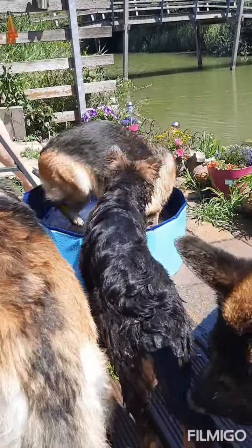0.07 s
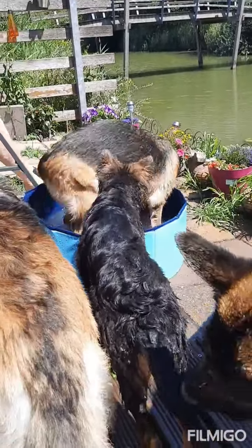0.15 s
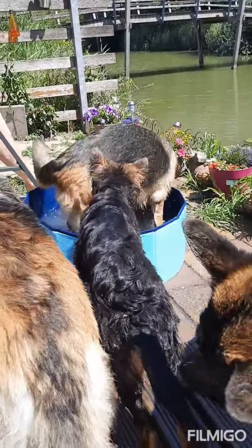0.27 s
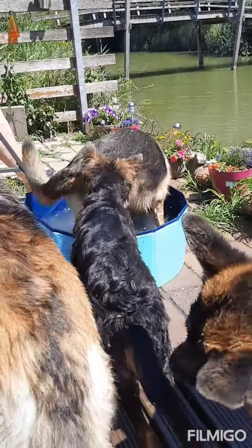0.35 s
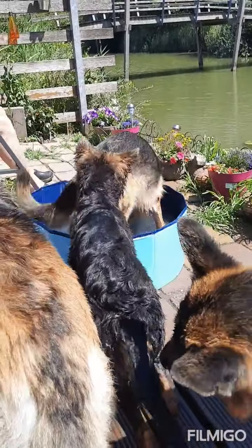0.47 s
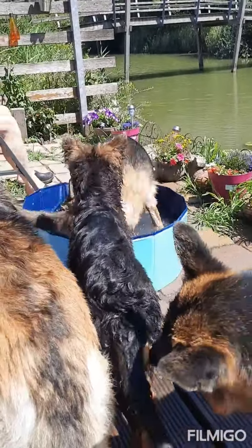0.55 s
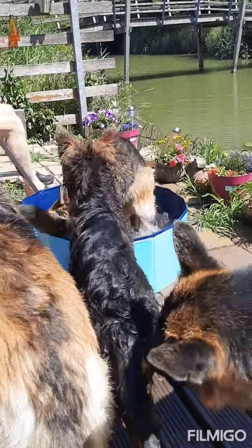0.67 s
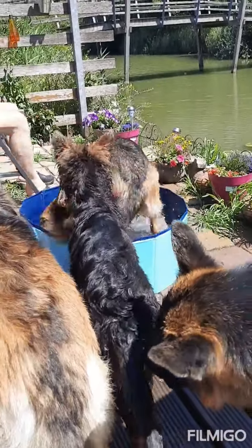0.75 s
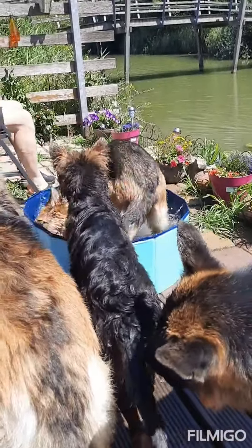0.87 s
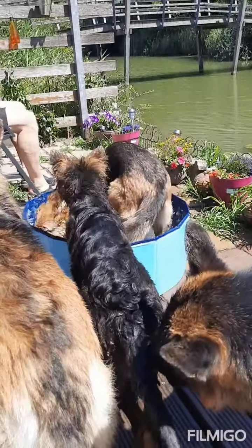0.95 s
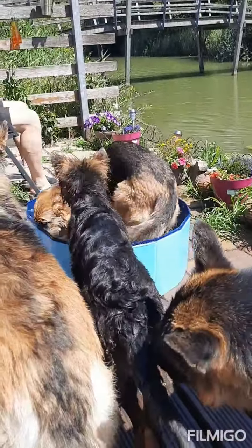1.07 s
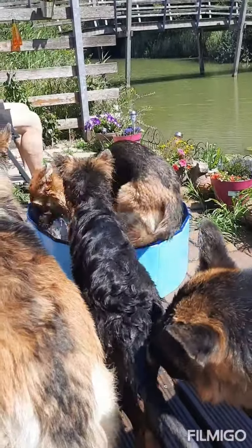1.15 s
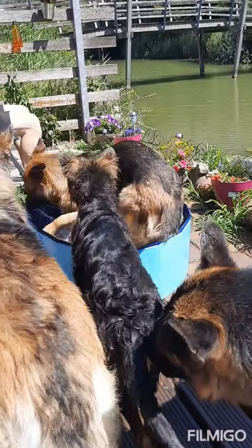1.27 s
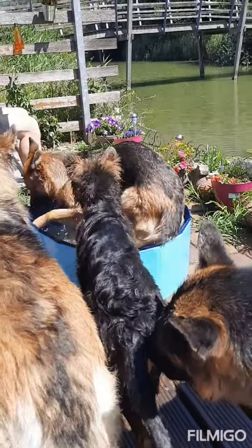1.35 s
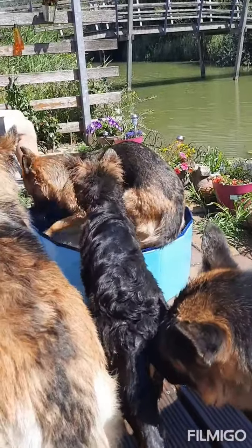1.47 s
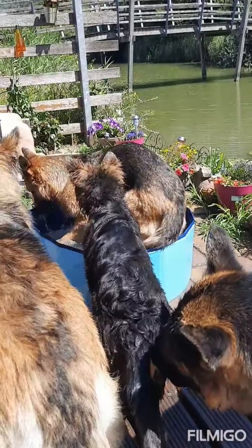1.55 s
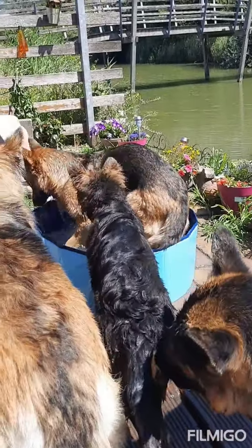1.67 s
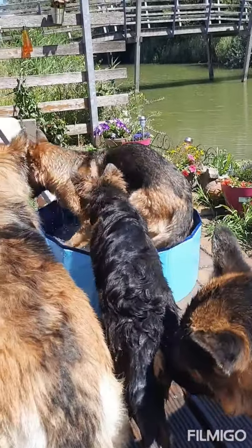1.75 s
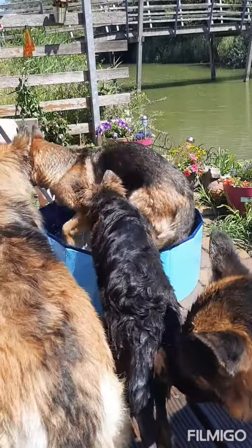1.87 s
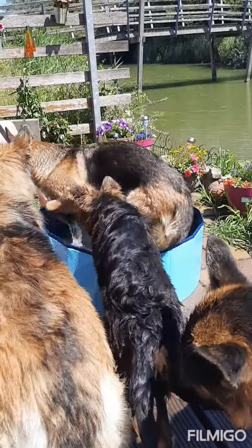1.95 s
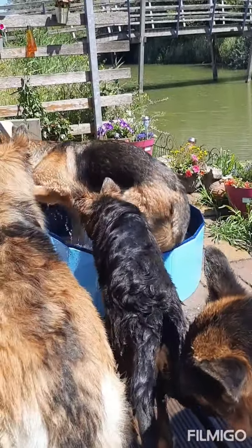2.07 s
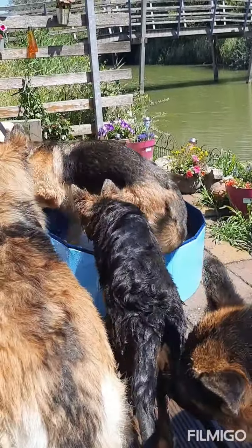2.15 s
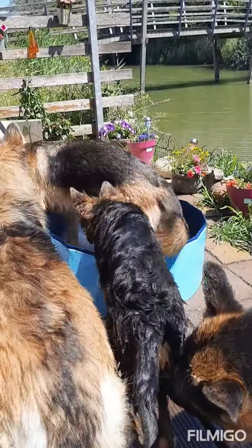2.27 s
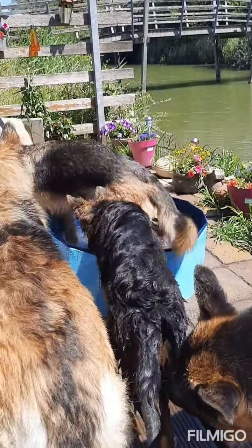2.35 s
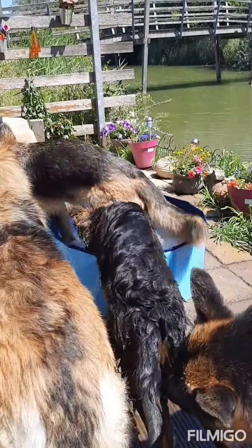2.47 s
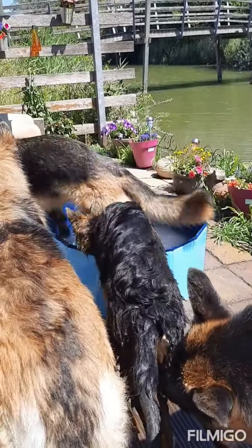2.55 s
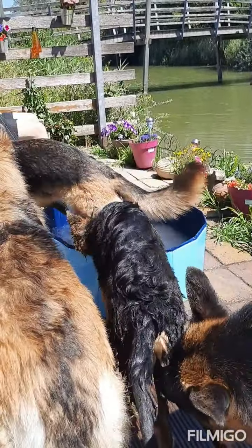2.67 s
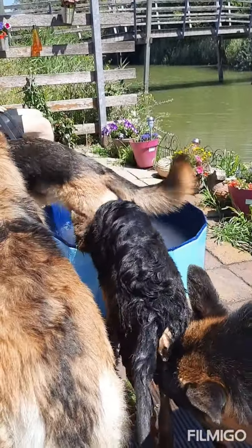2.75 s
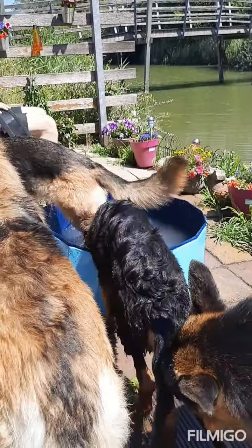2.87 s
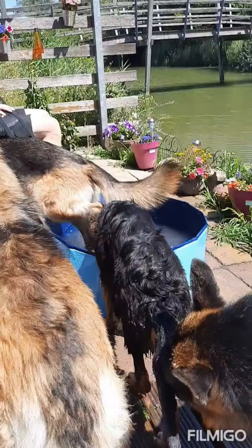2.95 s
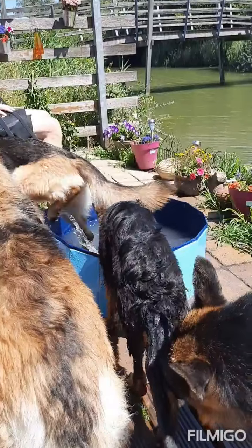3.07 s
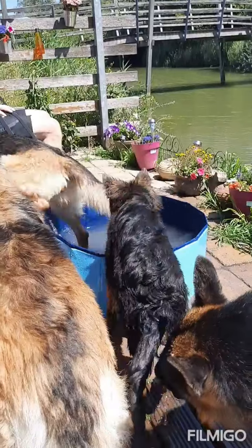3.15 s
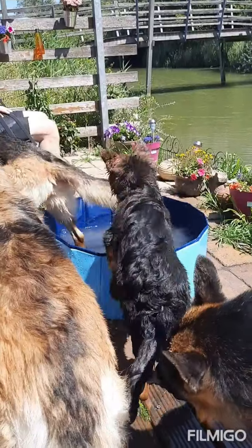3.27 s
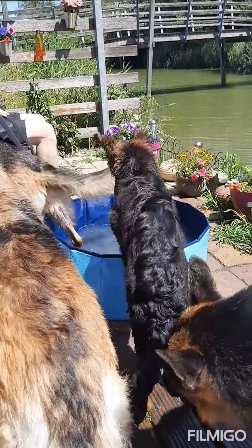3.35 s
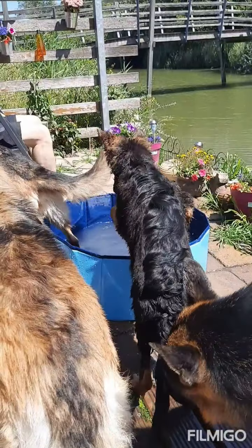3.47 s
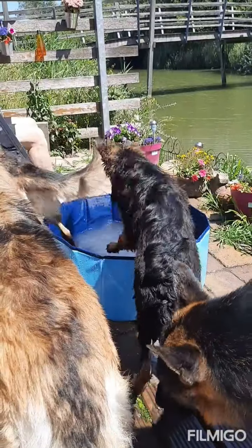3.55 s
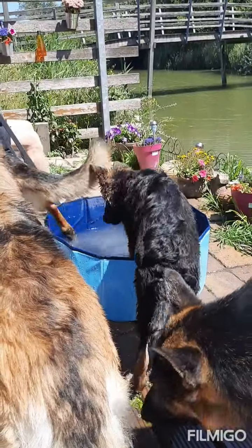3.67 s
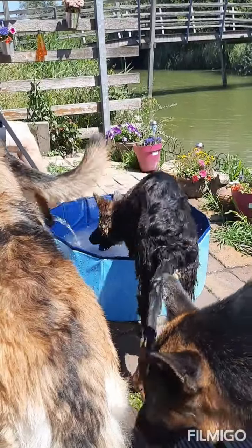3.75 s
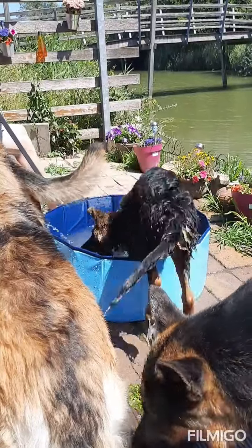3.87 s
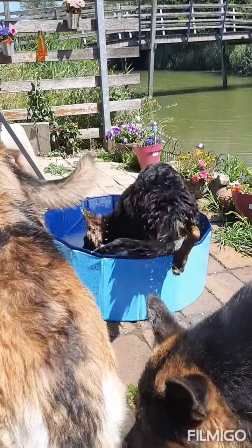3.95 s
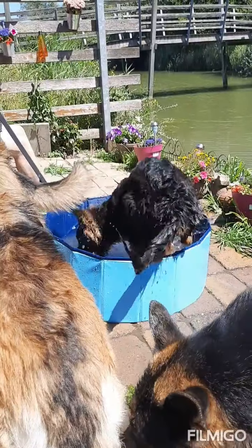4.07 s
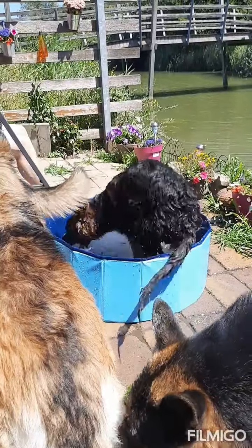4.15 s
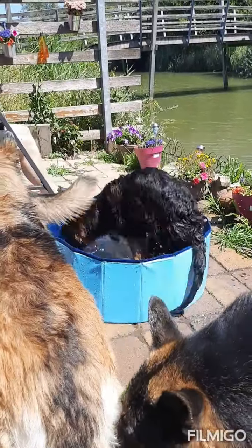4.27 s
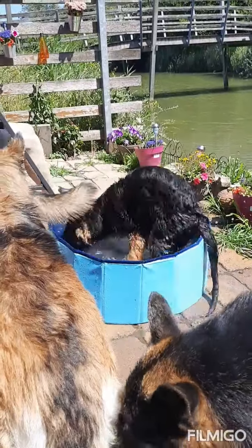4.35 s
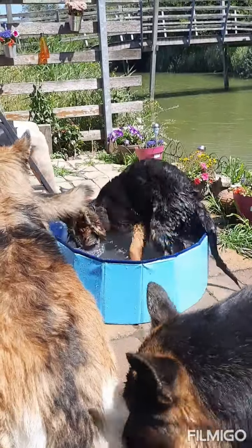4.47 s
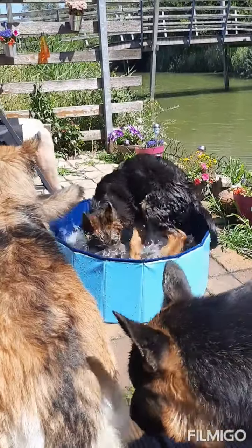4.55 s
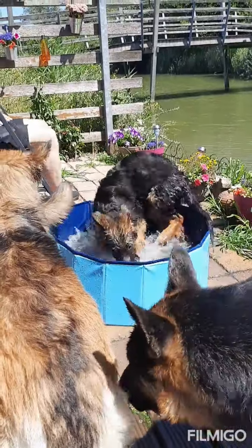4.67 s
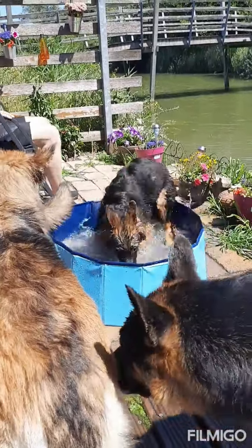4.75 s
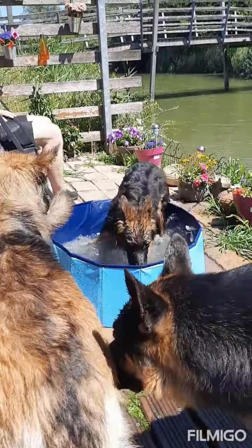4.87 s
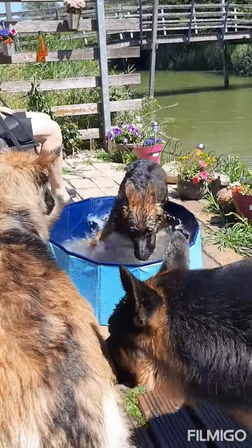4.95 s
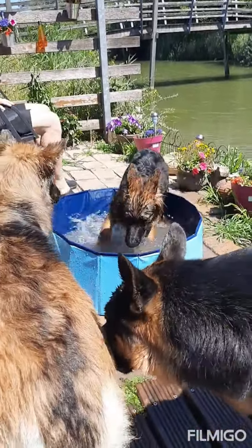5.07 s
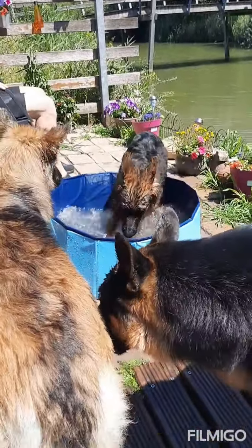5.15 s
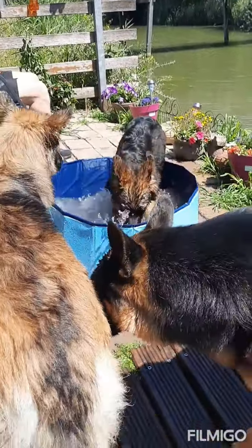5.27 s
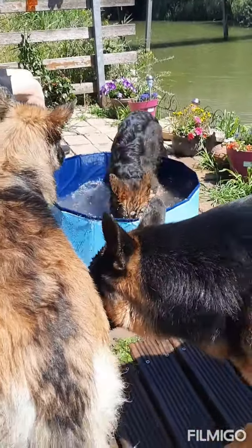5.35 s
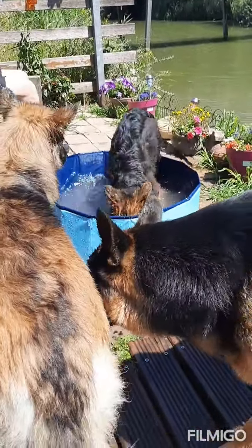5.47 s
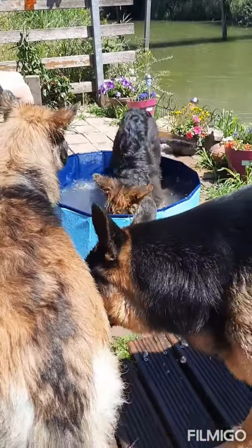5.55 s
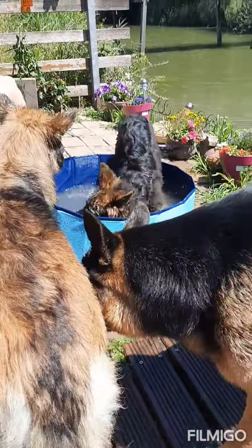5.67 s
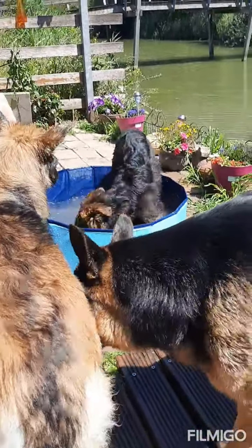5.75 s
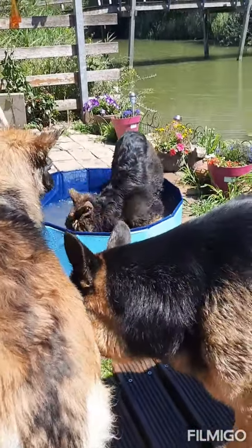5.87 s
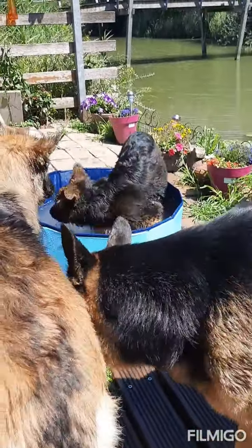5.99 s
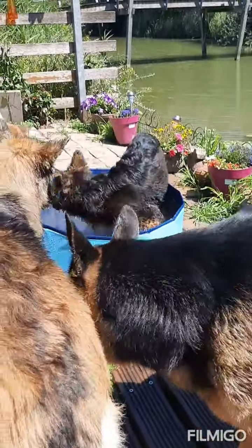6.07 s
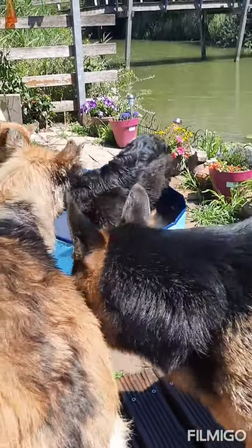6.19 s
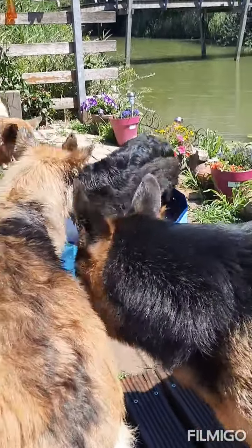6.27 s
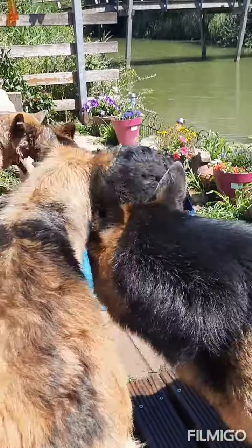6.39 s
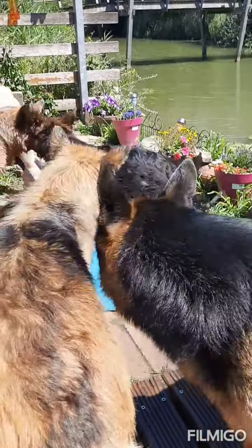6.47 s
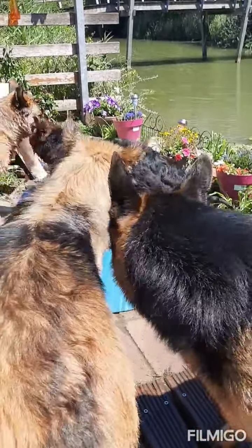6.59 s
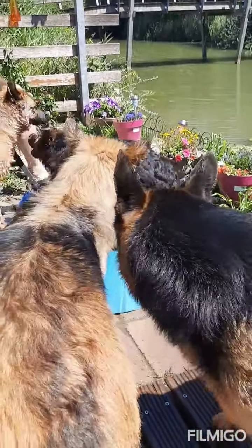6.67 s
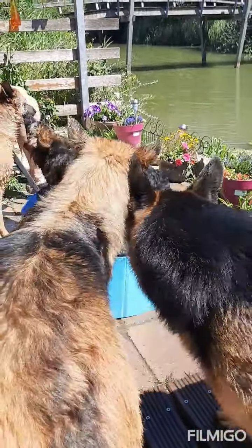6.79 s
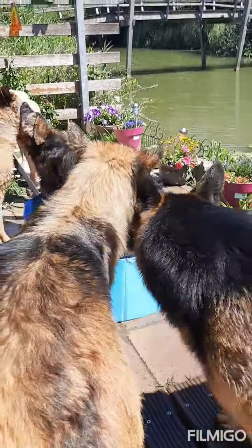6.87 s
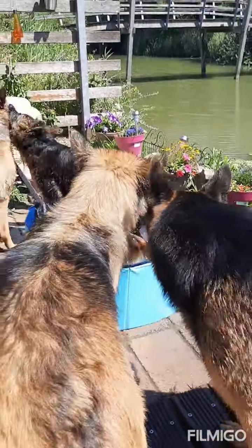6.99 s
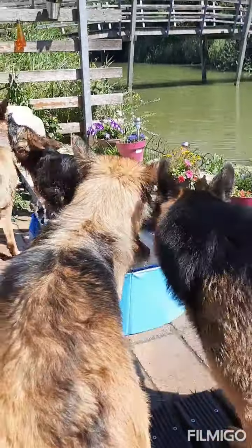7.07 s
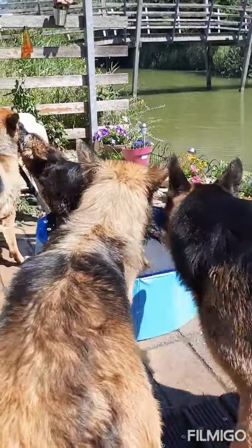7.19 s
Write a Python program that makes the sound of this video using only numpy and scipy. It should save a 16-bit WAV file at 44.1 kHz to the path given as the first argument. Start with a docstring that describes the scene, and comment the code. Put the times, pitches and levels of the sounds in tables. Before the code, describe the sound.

A faint outdoor hush and light breeze run throughout, picked up close in stereo. From 0 to 1.3 s quick paw strokes churn water in a small plastic pool: hollow gulps, clusters of bubbles and crisp hissing spray, with a prominent round gulp near 1.15 s. From about 1.3 to 3.8 s it is much quieter: scattered drips, small slaps, a short plop near 2.8 s, and low wind thuds leaning left. Around 3.9 s pawing resumes and thickens from 4.3 to 5.1 s, with deep gulps, bubbling gushes, sharp splashes and dull stamps on the pool floor. Smaller strokes and slaps continue to 6 s as the breeze swells. After a short lull, splashing surges from 6.4 s, with the loudest hollow stamp at 6.83 s, then bubbly slaps until the end at 7.2 s. Pool walls and paving add brief, tight echoes.

```python
"""Dogs wade and paw in a small plastic paddling pool on a patio, heard by two microphones.
A hush and light breeze run throughout. Quick strokes open it: paws trap air that rings as bubbles of
every size and throw hissing spray. From about 1.3 s mostly drips, small slaps and low wind thuds remain.
Busy pawing returns from 4 to 6 s, with gulps, gushes and stamps on the floor; after a short lull
come a last burst and the loudest stamp, near 6.8 s. Pool and paving echo the bubbles and stamps."""
import sys
import numpy as np
from scipy import signal
from scipy.fft import rfft, irfft, next_fast_len
from scipy.io import wavfile
from scipy.ndimage import uniform_filter1d

SR = 44100
rng = np.random.default_rng(int(sys.argv[2]) if len(sys.argv) > 2 else 0)


def digitize_waveform(pressure):
    """Quantize a signal to 16-bit integers and store it at the path in sys.argv[1].

    Rows of a 2-D input are taken as channels; values are limited to [-1, 1].
    """
    field = np.atleast_2d(pressure).T
    bounded = np.clip(field, -1, 1)
    quanta = np.round(bounded * 32767).astype(np.int16)
    wavfile.write(sys.argv[1], SR, quanta)


N = 318402
SIDES = np.array([[.5], [-.5]])  # splits a left-right difference in dB over the two channels


def amp(db):
    """Amplitude factor of a level in dB."""
    return 10 ** (np.asarray(db) / 20)


def evened(x):
    """Scale to an RMS of 1."""
    return x / np.sqrt(np.mean(x ** 2) + 1e-20)


def smoothed(x, samples):
    """Two passes of a moving average."""
    return uniform_filter1d(uniform_filter1d(x, samples), samples)


def read(points, hz):
    """Read a curve of (Hz, value), interpolated over log frequency."""
    f, value = np.transpose(points)
    return np.interp(np.log(hz + 1), np.log(f + 1), value)


def column(table, order):
    """One column of a time table at every sample."""
    rows = np.array(table)
    return np.interp(np.arange(N) / SR, rows[:, 0], rows[:, order])


def add(mix, s, sound):
    """Add a sound at s seconds, cut off at the end of the mix."""
    part = mix[..., round(s * SR):][..., :sound.shape[-1]]
    part += sound[..., :part.shape[-1]]


def noise(spectrum, same, size, patchy_db, flicker_db, lead_s=0):
    """Two-channel random short-time spectra with drifting patches and wide-band flicker."""
    frames, hz = 4 * N // size + 5, np.fft.rfftfreq(size, 1 / SR)
    a, b, c, d, patches = rng.standard_normal((frames, len(hz), 5)).T
    patches = uniform_filter1d(patches, size // 64, 0)  # over frequency
    patches = evened(uniform_filter1d(patches, 6, 1))  # over time
    flicker = evened(uniform_filter1d(rng.standard_normal(frames), 2))
    like = read(same, hz)[:, None]
    late = np.exp(-2j * np.pi * hz * lead_s)[:, None]
    left = a + 1j * b
    right = like * late * left + np.sqrt(1 - like ** 2) * (c + 1j * d)
    level_db = read(spectrum, hz)[:, None] + patchy_db * patches + flicker_db * flicker
    z = np.array([left, right]) * amp(level_db)
    return evened(signal.istft(z, nperseg=size, noverlap=3 * size // 4)[1][:, :N])


def surge(peak_s, length_s, rise_share, drop_db):
    """Gain that climbs to 1 at the peak and sinks again, steadily in dB."""
    t = (np.arange(N) / SR - peak_s) / length_s
    return amp(-drop_db * np.maximum(-t / rise_share, t / (1 - rise_share)))


def bubble(hz, t60_s, rise, turns, hold=0.99):
    """A sine that climbs as the bubble nears the surface; it swells over a few turns, holds and dies."""
    t = np.arange(0, t60_s, 1 / SR)
    tone = np.sin(2 * np.pi * hz * (t + .5 * rise * t ** 2 / t60_s))
    return tone * amp(-60 * (t / t60_s) ** hold) * np.tanh(t * hz / turns)


def swarm(lo_hz, hi_hz, per_s, cycles, spread_db, share, steady=.5, clumpy=0, count=40):
    """Random bubbles, most faint, a few large; slow swings in their summed level are evened by steady."""
    out = np.zeros(N)
    clumps = np.exp(clumpy * evened(smoothed(rng.standard_normal(N), 500)) - clumpy ** 2 / 2)
    for hz in np.geomspace(lo_hz, hi_hz, count):
        size = amp(spread_db * np.minimum(rng.exponential(1, N), 4))
        births = size * (rng.random(N) < clumps * per_s / count / SR)
        shape = bubble(hz, cycles / hz * rng.uniform(1.0, 1.74), rng.uniform(0, 1.0), 0.71)
        out += amp(read(share, hz)) * signal.oaconvolve(births * rng.choice([-1, 1], N), shape)[:N]
    power = smoothed(evened(out) ** 2, 1500)
    return evened(out / (abs(power) + 0.04) ** (steady / 2))


# Outdoor hush. Each row: frequency in Hz, relative density in dB per Hz.
HUSH_SPECTRUM = [(90, -32), (150, -5), (315, 16), (475, -11), (760, -4), (979, -4.5), (2000, -15),
                 (2500, 2), (2950, -32), (12400, -10.5), (16000, -19)]
# Left-right likeness of the hush. Each row: frequency in Hz, likeness from 0 to 1.
HUSH_LIKENESS = [(100, 0.33), (950, 0.4), (4000, 0.05)]
HUSH_DB = -68.5


def hush():
    """Steady outdoor air noise, mildly patchy, little shared between the channels."""
    return amp(HUSH_DB) * noise(HUSH_SPECTRUM, HUSH_LIKENESS, 512, patchy_db=3.2, flicker_db=0.77)


# Wind pressure. Each row: frequency in Hz, relative density in dB per Hz.
WIND_SPECTRUM = [(20, 7), (35, 0), (55, 5), (90, 2), (140, -7), (220, -31), (400, -71)]
# Breeze at the microphone ports. Each row: time in seconds, level in dB ahead of the bass loss.
BREEZE_LEVEL = [(0.0, -59), (0.9, -67), (2.0, -65.5), (3.6, -67.5), (4.2, -69), (5.3, -57.5), (6.2, -53.5),
                (7.22, -65)]
BREEZE_LEAN_DB = 5  # left over right
# Gusts and low thuds at the ports. Each row: peak in seconds, length in seconds,
# level in dB ahead of the bass loss, left-right difference in dB.
WIND_BUFFETS = [(0.42, 0.43, -53, 2), (1.166, 0.21, -52.5, 12), (1.733, 0.16, -54.5, 10),
                (2.437, 0.37, -51.5, 19.5), (2.75, 0.12, -45, 15), (2.942, 0.03, -46, 21),
                (3.047, 0.13, -48, 10), (3.17, 0.14, -55, 11), (3.376, 0.034, -38, 25),
                (3.47, 0.088, -47, -2), (4.12, 0.43, -48, 0), (4.444, 0.5, -47, 3), (4.816, 0.17, -41, -1),
                (5.021, 0.081, -36, -1), (6.522, 0.062, -40, 19), (6.576, 0.11, -34, 12),
                (6.793, 0.35, -40.5, 8), (7.049, 0.066, -43, 10), (7.22, 0.11, -54, 7)]
BUFFET_RISE_SHARE, BUFFET_DROP_DB = 0.45, 14


def wind():
    """Lumpy low pressure, partly shared between the ports, swelling in gusts."""
    lumps = noise(WIND_SPECTRUM, [(30, 0.11), (200, 1.0)], 1024, patchy_db=1.86, flicker_db=2.9)
    power = amp(column(BREEZE_LEVEL, order=1) + SIDES * BREEZE_LEAN_DB) ** 2
    for peak_s, length_s, db, pan_db in WIND_BUFFETS:
        gust = surge(peak_s, length_s, BUFFET_RISE_SHARE, BUFFET_DROP_DB)
        power = power + (amp(db + SIDES * pan_db) * gust) ** 2
    return lumps * np.sqrt(power)


# Stirring between strokes. Each row: time in seconds, then levels in dB of
# large bubbles, small bubbles, spray.
STIR_LEVELS = [(0.0, -42.5, -53, -47), (0.2, -74, -54.5, -58), (0.45, -66, -50, -53.5),
               (0.9, -62, -44, -42), (1.2, -49, -50.5, -49), (1.69, -69, -71, -58), (1.81, -67, -67.5, -63),
               (2.41, -70.5, -69.5, -62.5), (2.6, -66.5, -75, -66), (2.87, -67, -80, -62),
               (3.1, -63, -61, -54.5), (3.5, -65, -79, -64), (3.58, -74, -73, -89.5), (3.84, -60, -56, -55),
               (4.0, -53.5, -47.5, -50.5), (4.4, -49, -43.5, -44.5), (4.8, -39.5, -42.5, -41),
               (5.1, -37, -47, -41.5), (5.25, -49.5, -50, -46.5), (5.7, -48, -52.5, -48.5),
               (6.0, -76, -73, -59), (6.08, -58.5, -68, -54), (6.19, -68.5, -58, -71),
               (6.3, -82, -57, -60.5), (6.5, -41, -43.5, -47.5), (6.8, -47.5, -49, -44),
               (7.0, -66, -64, -49.5), (7.22, -54, -45, -52)]
# Paw strokes, by the air they drive in and the water they throw. Each row: peak in seconds,
# length in seconds, then levels in dB of big pockets, mid bubbles, small bubbles, spray.
PAW_STROKES = [(0.01, 0.077, -36.5, -58, -55, -46), (0.068, 0.1, -46, -40.5, -45.5, -66),
               (0.235, 0.13, -47, -39, -64, -65), (0.398, 0.09, -34, -42, -45.5, -41),
               (0.542, 0.11, -35, -41, -63, -46), (0.698, 0.48, -45, -38, -47.5, -66),
               (0.84, 0.11, -55, -55, -58, -45), (1.002, 0.12, -31, -33, -36.5, -46),
               (1.118, 0.23, -55, -38, -53, -69), (1.298, 0.15, -47, -63, -68, -46.5),
               (1.599, 0.03, -72, -81, -47, -65), (1.722, 0.02, -47, -35.5, -38, -44),
               (2.488, 0.068, -71, -79, -48.5, -48), (2.73, 0.18, -49.5, -60, -56, -45.5),
               (2.77, 0.066, -39.5, -42.5, -43, -43.5), (2.951, 0.082, -53, -70, -53.5, -55),
               (3.3, 0.19, -67, -69, -54.5, -58), (3.894, 0.082, -43.5, -37, -41.5, -49),
               (4.093, 0.041, -37, -35, -43, -53), (4.16, 0.071, -43, -49, -46, -47),
               (4.328, 0.099, -33, -35, -44.5, -42.5), (4.45, 0.1, -31, -34.5, -37.5, -42),
               (4.5, 0.06, -48, -53, -55, -65), (4.624, 0.11, -30, -33, -41, -40),
               (5, 0.078, -29.5, -42, -59, -45), (5.086, 0.055, -26.5, -52, -59, -52),
               (5.476, 0.037, -30.5, -36, -38, -56), (5.586, 0.19, -42.5, -43, -55, -47),
               (5.68, 0.11, -37.5, -59, -67, -58), (5.855, 0.12, -50.5, -70, -49, -46.5),
               (5.903, 0.19, -51.5, -56, -51.5, -60), (6.03, 0.026, -31.5, -44.5, -47, -50.5),
               (6.275, 0.15, -70, -53.5, -73, -54.5), (6.409, 0.11, -52, -37.5, -44.5, -51),
               (6.602, 0.19, -40.5, -36, -55, -66), (6.797, 0.2, -39, -40, -42.5, -56),
               (6.838, 0.024, -44, -31, -36, -48), (6.912, 0.059, -43, -36.5, -35, -40),
               (7.016, 0.07, -38, -46, -39.5, -49), (7.21, 0.39, -47.5, -34.5, -43.5, -48)]
STROKE_RISE_SHARE, STROKE_DROP_DB = 0.35, 13  # share of the length spent rising, fall at both ends


def stirred(stir_order, stroke_order, stir_offset_db=0):
    """Level of one layer: the stirring between strokes plus a surge at every stroke, summed as power."""
    power = amp(column(STIR_LEVELS, stir_order) + stir_offset_db) ** 2
    for row in PAW_STROKES:
        stroke = surge(row[0], row[1], STROKE_RISE_SHARE, STROKE_DROP_DB)
        power = power + (amp(row[stroke_order]) * stroke) ** 2
    return np.sqrt(power)


# Big air pockets by size. Each row: pitch in Hz, share in dB.
POCKET_SHARES = [(130, -9), (180, -4), (260, -2), (320, 9.5), (380, -5), (470, -0.5)]


def churn():
    """Three swarms of bubbles, each following how much air of that size is stirred in."""
    mid_share = [(480, -1.0), (640, 6.0), (900, 3.0), (1400, 5.5)]
    small_share = [(1400, 2.3), (2000, 7.0), (2700, 2.5), (3400, -3), (6000, 0.5)]
    big = swarm(131, 446.6, 300, 16.5, 3.7, POCKET_SHARES, steady=0.97)
    mid = swarm(491.8, 1288, 600, 24.3, 2.17, mid_share, steady=0.32, clumpy=.4)
    small = swarm(1413, 6176, 2500, 27.7, 2.74, small_share, steady=0.25, clumpy=.75)
    return big * stirred(1, 2, stir_offset_db=-4.5) + mid * stirred(1, 3) + small * stirred(2, 4)


# Spray hiss. Each row: frequency in Hz, relative density in dB per Hz.
SPRAY_SPECTRUM = [(800, -13), (1700, -6), (2600, -6), (4850, -11), (5350, -11), (6990, -13), (13100, -11),
                  (15100, -20.5), (16000, -9)]
# Left-right likeness of the spray. Each row: frequency in Hz, likeness from 0 to 1.
SPRAY_LIKENESS = [(2500, 0.065), (5000, 0.28), (15000, 0.043)]
SPRAY_LEAD_S, SPRAY_LEAN_DB = 0.00017, 3.5  # left leads, left over right
# Slaps of thrown water. Each row: start in seconds, level in dB, t60 in seconds,
# left-right difference in dB, coarse drops over fine mist in dB.
WATER_SLAPS = [(0.144, -40, 0.047, -2, 1), (0.244, -43.5, 0.31, 2, -1), (0.55, -35.5, 0.1, 6, 0),
               (0.846, -34, 0.031, 16, 2), (0.874, -38, 0.061, 3, 4), (1.028, -31.5, 0.029, 15, 7),
               (1.485, -42, 0.036, 4, 8), (1.611, -38, 0.044, 7, 5), (1.726, -43.5, 0.17, 3, 0),
               (2.14, -44.5, 0.027, -2, 5), (2.343, -51.5, 0.068, -4, -6), (2.468, -50, 0.058, -5, -10),
               (2.639, -45, 0.07, 4.5, -7), (2.7397, -46, 0.21, -9, 10), (2.996, -51, 0.59, -2, -13),
               (3.1061, -44, 0.03, 0, -17), (3.1674, -46, 0.13, -1, 7), (3.333, -36.5, 0.055, -6, -3),
               (3.455, -46, 0.28, 0, -4.5), (3.635, -66, 0.11, 1, 39), (3.7, -43.5, 0.13, 1, -4),
               (3.801, -40, 0.18, 2, 0), (3.9085, -42, 0.2, 3, 4), (3.963, -34.5, 0.1, -1, 3),
               (4.248, -35, 0.044, 0, 1), (4.4584, -41, 0.094, 15, -1), (4.708, -41, 0.057, 12, 11),
               (4.777, -29, 0.065, 6, -4), (4.819, -40.5, 0.24, 8, 7), (4.8485, -39, 0.034, 9, 16),
               (5.164, -38.5, 0.14, 8, 3), (5.311, -40.5, 0.12, 6, -8), (5.468, -44, 0.04, 11, -9),
               (5.574, -35.5, 0.11, 5, -3), (5.7243, -32.5, 0.042, -1, 11), (5.751, -38, 0.043, -5, 0),
               (5.837, -34, 0.04, 1, 1), (6.339, -41, 0.045, 11, -4), (6.747, -41.5, 0.1, 0, -11),
               (6.848, -35, 0.1, 5, -3), (7.0662, -43, 0.087, -2, 15), (7.1505, -39, 0.057, 3, 2),
               (7.194, -51, 0.19, 9, -21)]


def spray():
    """Hiss of drops and mist, peppered by ticks, swelling with the churn and bursting at each slap."""
    mist = stirred(3, 5) * amp(SIDES * SPRAY_LEAN_DB)
    drops = mist.copy()
    for s, db, t60_s, pan_db, coarse_db in WATER_SLAPS:
        t = np.arange(0, t60_s, 1 / SR)
        fall = amp(db + SIDES * pan_db - 60 * t / t[-1]) * np.tanh(t / 0.0031)  # the spray rains down
        add(mist, s, fall * amp(-coarse_db / 2))
        add(drops, s, fall * amp(coarse_db / 2))
    ticks = amp(3.2 * np.minimum(rng.exponential(1, N), 2.5)) * (rng.random(N) < 35 / SR)
    ticks = signal.lfilter([1], [1, -np.exp(-1 / (0.00079 * SR))], ticks)  # each dies in a few ms
    hiss = noise(SPRAY_SPECTRUM, SPRAY_LIKENESS, 256, 2.16, 0.94, SPRAY_LEAD_S)
    hiss = evened(hiss * (1 + 0.65 * ticks))
    low = signal.sosfiltfilt(signal.butter(N=2, Wn=6500, fs=SR, output="sos"), hiss)
    speck_share = [(6000, -5), (15000, 4.0)]
    specks = np.array([swarm(6350, 16400, 120, 5.9, 2.9, speck_share, steady=0, count=12)
                       for _ in SIDES])  # single drops bursting
    crossed = specks + 0.28 * specks[::-1]
    return drops * low + mist * (hiss - low + 0.16 * crossed)


# Phase between the ports for direct sound. Each row: frequency in Hz, left lead in radians.
PORT_PHASE = [(300, -0.02), (600, 1), (950, 0.0), (1800, 0.67), (2800, 0.73), (4100, 1.5)]
# Colour difference of the ports. Each row: frequency in Hz, left-right difference in dB.
PORT_LEAN = [(60, 0.5), (110, -2.5), (200, -1.5), (380, -4.5), (700, 6), (1290, 2.5), (2380, -3),
             (4400, -0.5), (8120, -7.5), (15000, 2)]
# Air inside the pool walls. Each row: frequency in Hz, width in Hz, dB over the sound that drives it.
POOL_HOLLOW = [(317, 44, -2), (630, 220, -18)]


def patio(x):
    """The hollow of the pool rings along; pool wall and paving add a short tail of sparse echoes."""
    length = SR // 8
    taps = np.zeros((4, length))
    at = np.arange(60, length - 20, 20)
    at = at + rng.integers(0, 20, (len(taps), len(at)))
    np.put_along_axis(taps, at, rng.choice([-1., 1.], at.shape), 1)
    taps *= amp(-60 * np.arange(length) / SR / 0.079)  # t60 in seconds
    taps /= np.linalg.norm(taps[0])
    # two echo patterns take turns, so no fixed colouring builds up
    turn = 2 * np.pi * 1.7 * np.arange(N) / SR
    echoes = signal.fftconvolve([x * np.cos(turn)], taps[:2], axes=1)
    echoes = echoes + signal.fftconvolve([x * np.sin(turn)], taps[2:], axes=1)
    size = next_fast_len(N)
    hz = np.fft.rfftfreq(size, 1 / SR)
    # the walls return more of the small bubbles
    wet = amp(read([(130, -33.5), (300, -5.0), (1000, -4.0), (3000, -1.0)], hz))
    direct = rfft(x, size) * np.array([np.ones(len(hz)), np.exp(-1j * read(PORT_PHASE, hz))])
    ports = amp(SIDES * read(PORT_LEAN, hz))
    rings = 1 + sum(amp(db) / (1 + 2j * (hz - f) / width) for f, width, db in POOL_HOLLOW)
    both = direct + wet * rfft(echoes[:, :N], size)
    return irfft(both * ports * rings / 1.39, size)[:, :N]


# Air pockets closing under a paw. Each row: start in seconds, level in dB ahead of the patio,
# starting pitch in Hz, t60 in seconds (10 ms at least).
PAW_GULPS = [(0.071, -26, 641, 0.082), (0.235, -30.5, 794, 0.07), (0.378, -26, 704, 0.057),
             (0.4, -28.5, 790, 0.057), (0.466, -25.5, 197, 0.062), (0.502, -29, 355, 0.084),
             (0.51, -23, 700, 0.015), (0.599, -22.5, 314, 0.033), (0.628, -26.5, 352, 0.051),
             (0.651, -33, 690, 0.11), (0.706, -37, 750, 0.062), (0.741, -31, 720, 0.058),
             (0.793, -23.5, 355, 0.028), (0.846, -27.5, 1000, 0.041), (0.902, -30.5, 890, 0.045),
             (0.932, -22, 426, 0.029), (0.981, -18.5, 340, 0.035), (1.004, -29.5, 322, 0.14),
             (1.058, -33, 717, 0.06), (1.087, -24, 279, 0.16), (1.124, -23, 271, 0.084),
             (1.148, -10.5, 322, 0.055), (1.302, -37.5, 280, 0.089), (1.413, -31.5, 313, 0.017),
             (2.777, -15, 299, 0.036), (2.788, -23, 241, 0.037), (3.368, -50, 114, 0.065),
             (3.728, -42, 808, 0.07), (3.878, -29, 810, 0.087), (3.91, -24, 1026, 0.056),
             (3.968, -26, 725, 0.041), (4.023, -35.5, 293, 0.059), (4.044, -31, 346, 0.049),
             (4.118, -31.5, 304, 0.14), (4.312, -33, 333, 0.12), (4.418, -16.5, 252, 0.1),
             (4.441, -12, 168, 0.044), (4.494, -23.5, 263, 0.23), (4.578, -16.5, 340, 0.023),
             (4.599, -15.5, 330, 0.022), (4.715, -29, 662, 0.056), (4.842, -30.5, 442, 0.17),
             (4.979, -26.5, 290, 0.15), (5.026, -15.5, 355, 0.021), (5.066, -28, 307, 0.13),
             (5.219, -32, 1110, 0.033), (5.287, -44, 812, 0.23), (5.335, -34, 665, 0.05),
             (5.535, -31.5, 305, 0.05), (5.571, -36.5, 705, 0.32), (5.592, -21.5, 625, 0.081),
             (5.652, -26, 334, 0.045), (5.671, -28, 286, 0.06), (5.772, -37.5, 776, 0.041),
             (5.851, -40, 750, 0.06), (6.306, -45.5, 940, 0.1), (6.42, -30, 305, 0.048),
             (6.469, -15, 300, 0.0077), (6.502, -31, 688, 0.071), (6.552, -17, 312, 0.016),
             (6.586, -22, 352, 0.057), (6.911, -18, 522, 0.027), (6.931, -24.5, 940, 0.023),
             (7.019, -19.5, 546, 0.033), (7.048, -28.5, 430, 0.06), (7.204, -23, 1160, 0.04)]


def gulps():
    """Single loud bubbles, climbing slightly in pitch; the loudest hold longer, then drop."""
    out = np.zeros(N)
    for s, db, hz, t60_s in PAW_GULPS:
        hold = 1.09 + 0.03 * max(db + 13.5, 0)
        add(out, s, amp(db) * bubble(hz, max(t60_s, .01), 0.09, 1.02, hold))
    return out


# Clumps of small bubbles born together. Each row: start in seconds, top level in dB ahead of the patio,
# middle pitch in Hz.
BUBBLE_GUSHES = [(0.554, -45, 1280), (0.652, -26, 2200), (0.692, -23, 2340), (0.74, -26, 1530),
                 (0.79, -27, 1860), (0.844, -27, 2400), (1.725, -22.5, 3030), (4.288, -26.5, 895),
                 (4.298, -26, 2230), (4.372, -23, 1530), (4.494, -25, 1260), (4.711, -20.5, 2530),
                 (4.782, -31, 1800), (4.847, -16, 2730), (5.015, -28, 1040), (6.765, -29, 2320)]
GUSH_S, GUSH_OCTAVES, GUSH_CYCLES = 0.0051, 0.52, 18.7  # spread in time, pitch either way, t60 in cycles of the pitch


def gushes(count=9):
    """Clumps of short bubbles scattered around a middle pitch."""
    out = np.zeros(N)
    for (s, db, hz), draws in zip(BUBBLE_GUSHES, rng.random((len(BUBBLE_GUSHES), count, 3))):
        for late, off, weak in draws:
            f = hz * 2 ** (GUSH_OCTAVES * (2 * off - 1))
            sound = bubble(f, GUSH_CYCLES / f, 0.53, 1.0)
            add(out, s + GUSH_S * late ** 2, amp(db - 25.0 * weak) * sound)
    return out


# Drips falling back from fur and paws. Each row: start in seconds, level in dB ahead of the patio,
# starting pitch in Hz.
FALLING_DRIPS = [(0.82, -26.5, 1160), (0.935, -33, 1260), (1.017, -34, 670), (1.088, -27, 1920),
                 (1.489, -40, 2630), (1.566, -44, 1360), (1.59, -37, 1855), (1.654, -47, 675),
                 (1.705, -34, 1910), (1.955, -46, 1220), (2.03, -48, 750), (2.117, -42, 975),
                 (2.319, -51, 760), (2.471, -34.5, 2180), (2.495, -31, 1680), (2.5, -29, 1990),
                 (2.675, -41, 1970), (2.706, -41, 2580), (2.756, -30, 2360), (2.94, -41, 2570),
                 (2.961, -32, 2350), (3.02, -39, 1320), (3.078, -41.5, 1240), (3.105, -43, 2120),
                 (3.145, -43, 1260), (3.178, -49, 790), (3.477, -44, 1930), (3.634, -48.5, 1540),
                 (3.805, -39, 1130), (4.255, -31, 1960), (4.298, -30.5, 703), (4.401, -30, 2030),
                 (4.461, -26, 956), (4.668, -24.5, 2560), (4.823, -21, 2300), (4.843, -25.5, 1007),
                 (6.491, -27, 1665), (6.614, -30, 1550)]


def drips():
    """Each drip rings one small bubble; a weaker second droplet follows a few ms later."""
    out = np.zeros(N)
    for (s, db, hz), (late, off) in zip(FALLING_DRIPS, rng.uniform(-1.01, 1, (len(FALLING_DRIPS), 2))):
        add(out, s, amp(db) * bubble(hz, 42 / hz, 0.13, 0.886, hold=0.89))
        second = bubble(hz * (1.04 + 0.051 * off), 60 / hz, 0.079, 0.86)
        add(out, s + 0.0082 + .005 * late, amp(db - 7.5) * second)
    return out


# Paws stamping the pool floor. Each row: start in seconds, level in dB ahead of the patio,
# lift of modes above 400 Hz in dB, rise in seconds, factor on t60 that the paw leaves.
PAW_STAMPS = [(1.717, -34, -8, 0.00066, 1.2), (4.093, -27, 5.5, 0.0021, 1.1),
              (4.619, -23.5, 4.5, 0.0016, 0.93), (4.784, -23.5, -3, 0.00076, 0.39),
              (5.469, -26.5, 1.5, 0.00094, 0.58), (6.022, -22, -27, 0.0009, 0.42),
              (6.83, -4, -2, 0.0022, 0.56), (7.006, -20, 16, 0.0059, 0.86)]
# Plastic floor under water. Each row: mode in Hz, relative level in dB, t60 in seconds for a factor of 1.
FLOOR_MODES = [(149, -5, 0.055), (314, -0.5, 0.054), (554, 6, 0.014), (614, 10.5, 0.015), (1280, -6, 0.015)]


def stamps():
    """A paw sets off the decaying modes of the plastic floor and damps them to its own degree."""
    out = np.zeros(N)
    t = np.arange(0, .12, 1 / SR)
    for s, db, upper_db, rise_s, free in PAW_STAMPS:
        ring = 0
        for hz, mode_db, t60_s in FLOOR_MODES:
            decay = amp(mode_db + upper_db * (hz > 400) - 60 * t / (t60_s * free))
            ring = ring + decay * np.sin(2 * np.pi * hz * t)
        add(out, s, -amp(db) * ring * np.tanh(t / rise_s) ** 2)
    return out


# Gliding cavities, from tiny drops to a filling hollow. Each row: start in seconds, level in dB,
# start pitch in Hz, end pitch in Hz, length in seconds, left-right difference in dB.
CAVITY_GLIDES = [(3.204, -58, 2050, 3160, 0.14, 4), (4.271, -39.5, 1420, 614, 0.035, 4),
                 (4.7785, -29, 4880, 5860, 0.0027, 10), (5.689, -49, 4500, 8900, 0.0051, 8),
                 (5.731, -26.5, 1290, 6860, 0.003, 9), (6.17, -62.5, 2450, 2700, 0.17, -10),
                 (6.241, -51, 825, 657, 0.047, 1), (6.718, -33.5, 478, 835, 0.057, 6),
                 (6.767, -32.5, 740, 1220, 0.043, 7)]


def glides():
    """Swept tones of cavities that shrink or grow; the long ones flutter irregularly in loudness."""
    out = np.zeros((2, N))
    for s, db, start_hz, end_hz, length_s, pan_db in CAVITY_GLIDES:
        t = np.arange(0, length_s, 1 / SR)
        sweep = signal.chirp(t, start_hz, length_s, end_hz) * np.sin(np.pi * t / length_s)
        if length_s > .02:
            sweep *= evened(1.25 + 17.0 * smoothed(rng.standard_normal(SR // 4), 120))[:len(t)]
        add(out, s, amp(db + SIDES * pan_db) * sweep)
    return out


def scene():
    """Bubbles, drips and stamps pass through the patio; the other layers reach the ports as they are."""
    water = patio(churn() + gulps() + gushes() + drips() + stamps())
    return hush() + wind() + spray() + water + glides()


EDGE_HZ = 15900


def record(dry):
    """The microphones lose the deepest bass; then the band limit."""
    thin = signal.sosfilt(signal.butter(N=4, Wn=45, btype="high", fs=SR, output="sos"), dry)
    edge = signal.firwin(511, EDGE_HZ, window=("kaiser", 9), fs=SR)
    return signal.oaconvolve(thin, edge[None], "same")


dry = scene()
out = record(dry)
digitize_waveform(out)
```